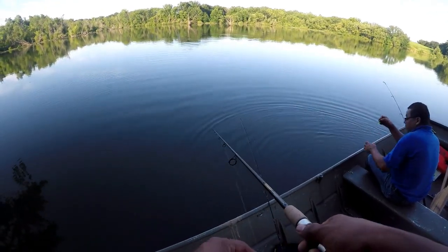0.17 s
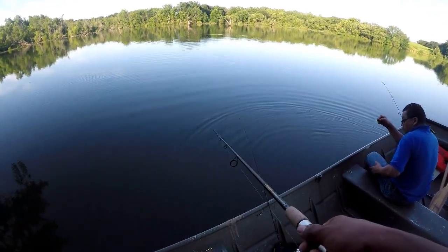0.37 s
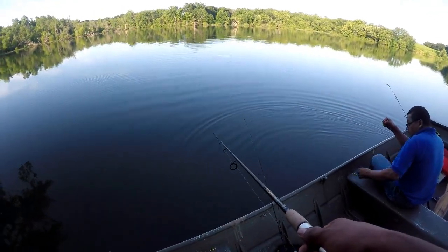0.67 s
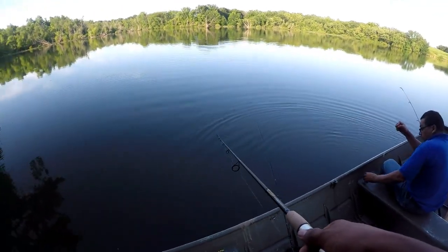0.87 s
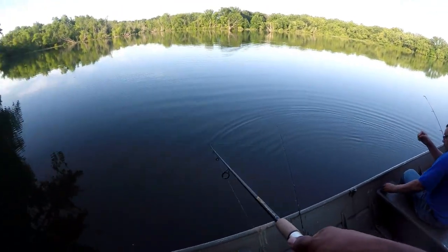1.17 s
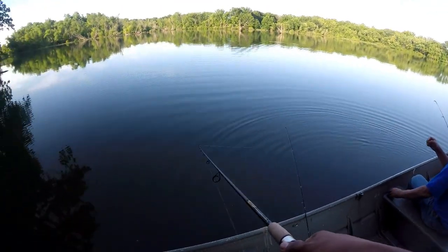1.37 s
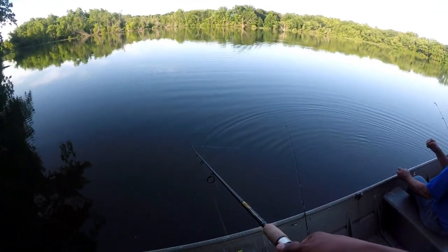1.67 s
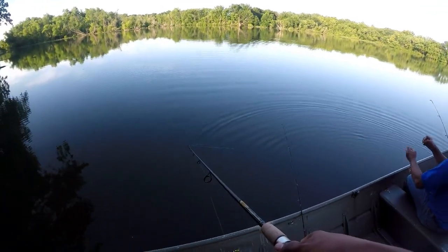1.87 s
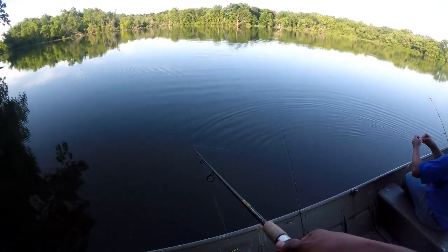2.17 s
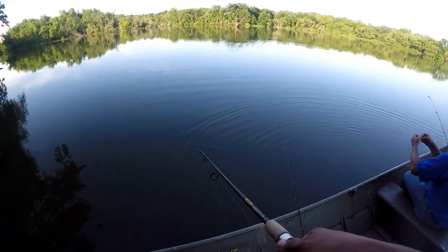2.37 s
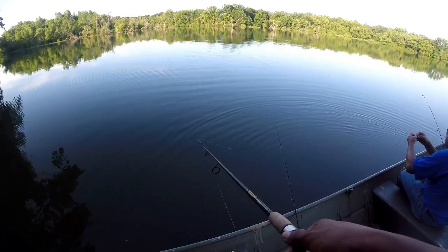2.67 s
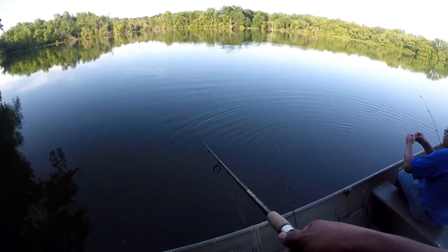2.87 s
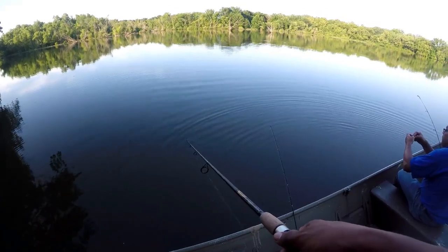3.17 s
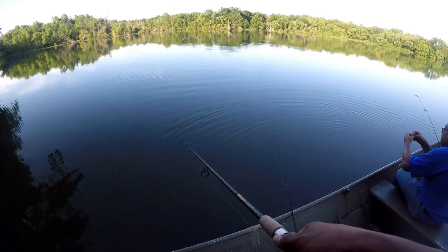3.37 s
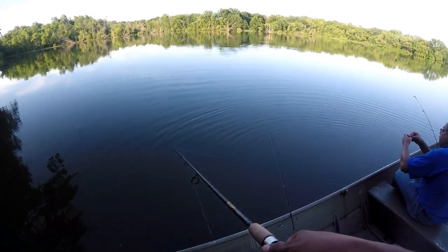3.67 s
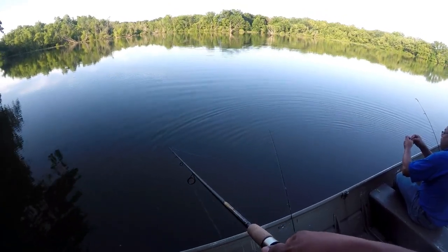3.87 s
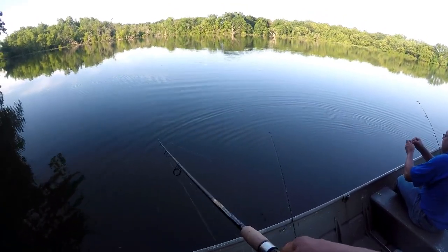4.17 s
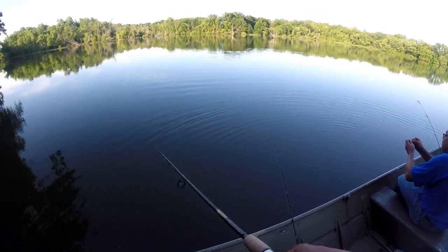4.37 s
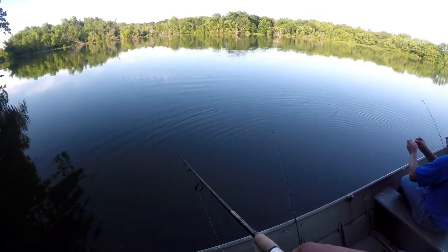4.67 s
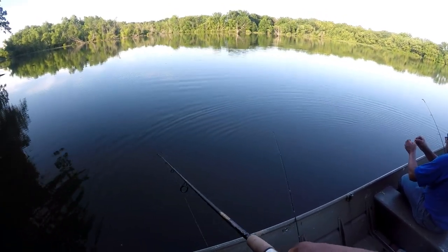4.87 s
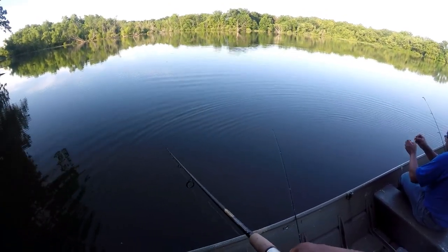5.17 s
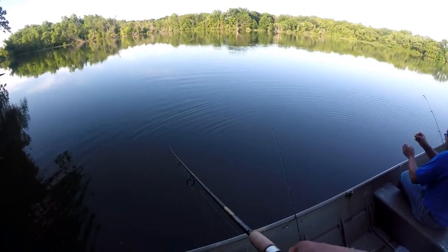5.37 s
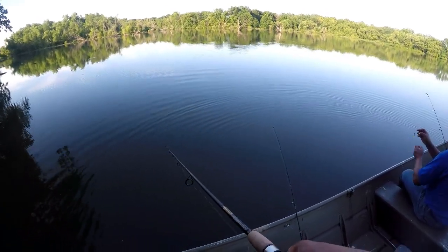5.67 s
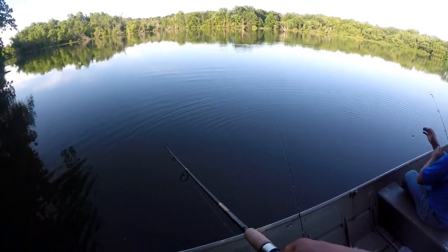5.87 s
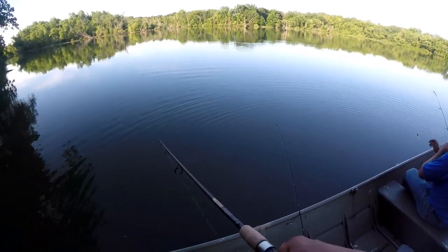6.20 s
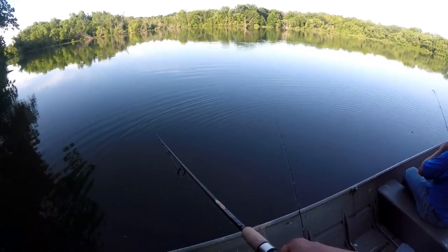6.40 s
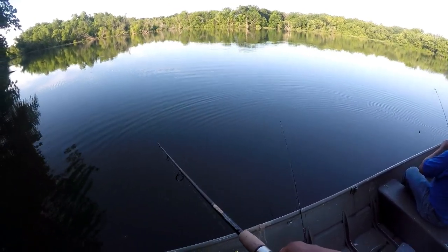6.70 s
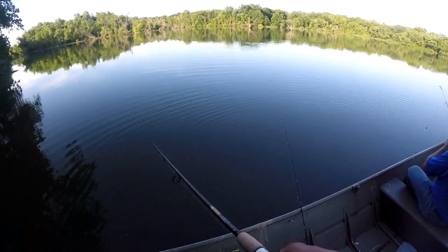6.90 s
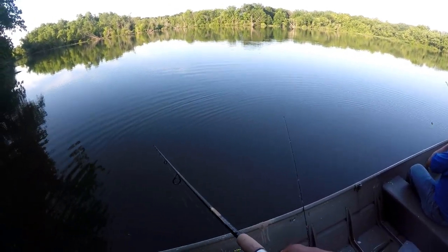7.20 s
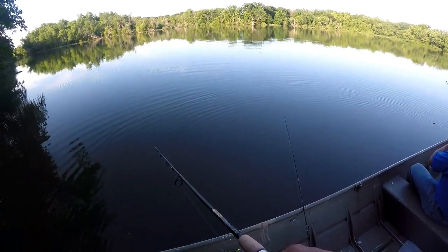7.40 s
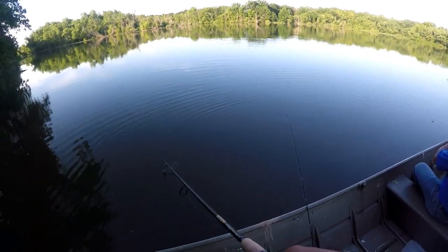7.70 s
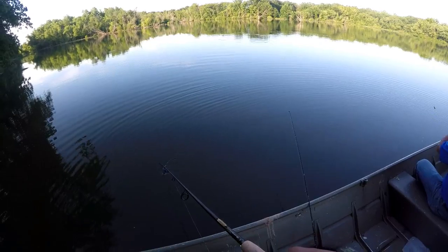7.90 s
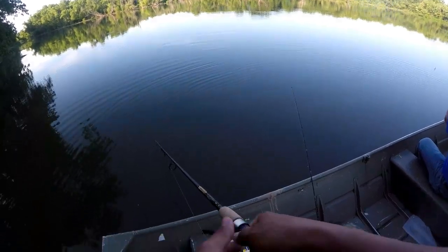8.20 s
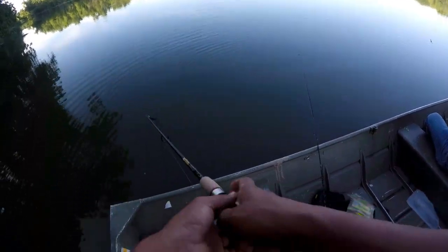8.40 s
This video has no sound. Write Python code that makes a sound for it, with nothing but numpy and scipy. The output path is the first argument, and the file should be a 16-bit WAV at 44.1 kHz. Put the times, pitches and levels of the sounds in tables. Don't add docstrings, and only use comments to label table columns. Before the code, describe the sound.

Outdoors on a quiet tree-ringed lake, a continuous chorus of rapid, raspy frog and insect chirps sits in a narrow high band. Cicadas buzz faintly and early on swoop downward; tiny bird chips and whistles appear, mostly from the middle onward. A soft low rumble of air and hull swells unevenly. The head-worn microphone picks up a few ticks late, then cloth rubbing and low knocks at the end.

```python
import sys
import numpy as np
from scipy import signal
from scipy.io import wavfile
from scipy.ndimage import uniform_filter1d

SR = 44100
rng = np.random.default_rng(int(sys.argv[2]) if len(sys.argv) > 2 else 0)


def to_linear_factor(level_db):
    exponent = np.asarray(level_db, float) / 20
    return 10 ** exponent


def generate_wav(signal):
    frames = np.transpose(np.atleast_2d(signal))
    scaled = np.clip(frames, -1, 1) * 32767
    pcm = np.round(scaled).astype(np.int16)
    wavfile.write(sys.argv[1], SR, pcm)


N = 376922

# f/Hz, density/dB
RUMBLE_SPECTRUM = [(3.5, 2), (6, -5.5), (25, 4), (33, -1), (41, 1), (49, 0), (57, -6.5), (75, -11),
                   (110, -28.5), (140, -48), (240, -120)]
# t/s, peak level/dB
GUSTS = [(0.01, -38), (.26, -47.5), (.69, -49), (1.05, -49), (1.35, -45), (1.7, -53), (2.05, -53),
         (2.5, -63), (2.78, -49), (3.0, -41.5), (3.045, -36), (3.38, -44), (4.04, -46.5), (4.55, -54),
         (4.72, -43), (4.88, -44), (6.04, -41), (6.72, -53), (6.97, -57), (7.43, -52), (7.84, -62),
         (8.05, -51), (8.18, -45), (8.28, -45), (8.38, -43), (8.47, -55)]
# f/Hz, density/dB
AIR_SPECTRUM = [(41, -28), (70, -2.5), (96, -3.5), (494, -21), (592, -23), (1360, -27), (2490, -29),
                (3570, -23), (4090, -29.5), (4570, -35), (6130, -32.5), (10000, -38), (12600, -47),
                (15000, -53)]
# f/Hz, level/dB
PORT_SIDE = [(60, -8.5), (92, 1), (140, 2.5), (210, 2.5), (330, 4), (500, 6.5), (760, 10.5), (1160, 8),
             (1760, 5), (2690, -2), (4110, -7.5), (6270, 1), (9570, -0.5), (14600, 0.5)]
# f/Hz, level/dB
PORT_BALANCE = [(60, 0.5), (110, 0), (200, -1.5), (370, 0.5), (690, -0.3), (1270, 0), (2340, -0.8),
                (4310, 3.5), (7930, -3.5), (14600, -0.5)]
# t/s, peak level/dB
LEAF_BREATHS = [(.4, -74), (1.2, -85), (2.0, -76), (2.3, -67.5), (2.65, -69), (3.0, -71), (3.65, -73),
                (4.05, -71), (4.85, -79), (5.3, -70), (6.0, -74), (7.4, -78)]
# t/s, level/dB
CHOIR_LEVEL = [(0, -74), (1.2, -77), (2.3, -71), (3.1, -78), (3.5, -90), (3.9, -74), (4.45, -92),
               (4.9, -74), (6, -70), (7, -73), (8, -73), (8.55, -71)]
# t/s, level/dB, f/Hz
FROG_CHORUS = [(1.9, -84, 2050), (2.2, -76, 1962), (2.5, -73.5, 2070), (2.85, -75.5, 2230),
               (3.1, -78, 2060), (3.4, -79, 2030), (3.7, -68, 1810), (4.25, -86, 1610), (4.85, -74, 1690),
               (5.1, -83, 1890)]
# t/s, level/dB, f/Hz
SNAPS = [(2.29, -55, 1343), (4.243, -54, 1900), (2.7, -54, 460), (3.015, -46, 560), (3.045, -63, 660),
         (2.65, -58, 7780), (4.98, -57, 4900), (5.125, -61, 4300), (5.15, -65, 4100), (5.21, -59, 1900),
         (2.94, -58, 6600), (3.128, -66, 1980), (4.11, -58, 6300), (5.89, -60, 7395), (6, -59, 5200),
         (7.02, -58, 4890), (8.36, -55, 4300), (7.957, -53.5, 1000), (7.957, -49, 500), (3.2, -55, 500),
         (3.03, -55, 420)]
# t/s, level/dB, ring f/Hz, decay time T60/s
TICKS = [(5.966, -37, 480, .035), (6.148, -37, 520, .03), (6.624, -38, 330, .07), (7.045, -38, 170, .06),
         (4.782, -46, 150, .08), (7.957, -38, 440, .05), (7.964, -39, 150, .08), (8.2, -40, 150, .08),
         (8.325, -34, 160, .12), (8.42, -36, 200, .1), (8.462, -33, 165, .1), (8.525, -36, 160, .1)]
# t/s, level/dB, ring f/Hz
SLIPS = [(8.105, -49, 450), (8.2, -44, 460), (8.29, -49, 750), (8.298, -44, 450), (8.325, -41, 190),
         (8.37, -38.5, 200), (8.25, -46, 200), (8.305, -52, 1080), (8.418, -48, 760), (8.47, -39, 115),
         (8.33, -43, 105), (8.425, -44, 200), (8.468, -33.5, 190), (8.51, -47, 450)]
# f/Hz, density/dB
CLOTH_SPECTRUM = [(150, -5), (260, -1), (297, -7), (461, -3), (633, -10), (754, -10), (934, -12.5),
                  (1730, -18.5), (2010, -27), (3000, -24), (3900, -71), (6600, -120)]
# f/Hz, level/dB
CLOTH_SIDE = [(60, -7), (130, 3), (290, 4.5), (630, 6.5), (1390, 14), (1560, 10), (1750, 0), (3040, -3),
              (6660, 2), (14600, 0)]
# t/s, peak level/dB
NUDGES = [(.32, -69), (1.4, -70.5), (2.25, -70), (2.36, -68), (2.55, -72), (3.03, -65.5), (3.68, -79),
          (4.8, -68), (6.0, -70), (7.0, -69)]
# t/s, pressure level/dB
STROKE = [(7.85, -80), (8.0, -65), (8.06, -58), (8.11, -53), (8.155, -57), (8.19, -48.5), (8.24, -47.5),
          (8.34, -48.5), (8.43, -50), (8.5, -53), (8.55, -50)]
# t/s, length/s, start f/Hz, end
# f/Hz, level/dB
SLIDES = [(3.615, .02, 2480, 2940, -56), (3.632, .016, 2880, 2660, -57), (3.644, .022, 2700, 2640, -61),
          (4.32, .011, 2550, 3050, -60), (4.329, .009, 3200, 2900, -62), (4.335, .013, 2850, 3350, -60),
          (6.203, .036, 3280, 3720, -62), (3.945, .03, 3620, 3800, -64), (5.125, .04, 4300, 3700, -70),
          (5.165, .04, 3250, 3100, -67), (6.292, .025, 3500, 2900, -66), (5.78, .1, 5840, 5830, -74),
          (5.884, .075, 3830, 3640, -62), (6.108, .018, 2250, 2830, -65), (6.124, .028, 2720, 2050, -64),
          (4.66, .03, 1700, 1620, -65), (7.086, .05, 3800, 4525, -70), (7.598, .04, 5600, 5980, -65),
          (7.198, .036, 6300, 5680, -68), (8.172, .036, 2480, 2720, -61), (6.66, .15, 4520, 4480, -77),
          (6.51, .05, 3250, 3150, -70), (7.13, .07, 3230, 3330, -69), (8.215, .03, 2640, 2570, -74)]
# t/s, length/s, foot f/Hz, top f/Hz,
# level/dB
ARCHES = [
    (5.054, .08, 3950, 4700, -66),
    (5.125, .043, 3270, 3620, -62),
    (3.82, .038, 3280, 3480, -63),
]
# t/s, length/s, start f/Hz, end f/Hz, level/dB
SLIDES_RIGHT = [(.9, .09, 2330, 1680, -69), (1.71, .095, 2230, 1620, -69), (1.74, .04, 2580, 2520, -72),
                (5.75, .05, 5550, 4600, -73), (5.945, .035, 2980, 2300, -71), (6.21, .04, 6200, 6130, -69),
                (6.165, .045, 5450, 4300, -73), (6.285, .03, 2900, 2200, -72), (6.77, .05, 2950, 3350, -69),
                (7.946, .05, 6590, 6590, -74)]
# t/s from its start, length/s, start f/Hz, end f/Hz, level/dB
CHIP = [
    (0, .024, 5300, 5850, -61),
    (.052, .06, 6280, 5750, -68.5),
]
# t/s, added level/dB, left minus right/dB
CHIP_TIMES = [(.272, -4, .8), (1.986, 2, .8), (3.568, 0, -3.5), (4.718, -3, .8)]
# t/s from its start, length/s, start f/Hz, end f/Hz, level/dB
WARBLE = [
    (0, .042, 4250, 6000, -68),
    (.033, .03, 5880, 5990, -69),
    (.072, .028, 6650, 5050, -66),
    (.102, .035, 5070, 4980, -72),
]
# t/s, added level/dB, left minus right/dB
WARBLE_TIMES = [
    (7.283, -1, -7.5),
    (7.578, -1, -7.5),
]
# t/s, f/Hz, level/dB
WHISTLES = [
    [(8.015, 2417, -75), (8.025, 2461, -63), (8.055, 2686, -65), (8.081, 2701, -65), (8.115, 2850, -65),
     (8.139, 3091, -65), (8.15, 3010, -63), (8.16, 2940, -73)],
    [(5.25, 2370, -74), (5.274, 2330, -65), (5.298, 2276, -63), (5.335, 2250, -65), (5.355, 2210, -71),
     (5.375, 2190, -67), (5.396, 2165, -71), (5.41, 2150, -81)],
    [(4.442, 2640, -72), (4.455, 2800, -60), (4.47, 2850, -59), (4.49, 2250, -69), (4.505, 2150, -69),
     (4.535, 2280, -71), (4.58, 2330, -75), (4.59, 2330, -82)],
    [(4.343, 3400, -68), (4.352, 3420, -56), (4.368, 3390, -53), (4.38, 3270, -59), (4.387, 3240, -74)],
]
# start t/s, length/s, level/dB, abdomen resonance f/Hz, drop at the end (0 to 1)
SWINGS = [
    (0.202, 0.4, -72.5, 5620, 0.88),
    (0.923, 0.5, -70.5, 5530, 0.99),
    (1.776, 0.42, -69.5, 5530, 0.99),
    (2.503, 0.19, -69, 5350, 0),
    (3.602, 0.056, -69, 5700, 0),
    (4.717, 0.21, -71, 5970, 0.07),
    (5.208, .3, -72, 5920, 0),
    (5.706, 0.51, -70.5, 5800, 0.02),
    (6.802, 0.82, -74, 5680, 0),
    (8.2, 0.46, -73, 5620, 0.06),
]
# centre t/s, level/dB, f/Hz
LOW_CHIRPS = [(0.014, -77, 3470), (0.096, -62, 3450), (0.166, -64, 3440), (0.267, -66, 3220),
              (0.319, -62, 3420), (0.547, -61, 3400), (0.762, -62, 3480), (0.828, -61, 3360),
              (0.886, -62, 3400), (0.996, -56.5, 3450), (1.076, -63, 3450), (1.261, -54, 3480),
              (1.389, -65, 3450), (1.525, -59, 3400), (1.646, -61, 3416), (1.772, -60, 3400),
              (1.999, -60.5, 3370), (2.351, -62, 3204), (2.415, -61, 3450), (2.518, -62, 3470),
              (2.632, -62, 3430), (2.828, -61.5, 3380), (3.021, -61.5, 3440), (3.069, -60.5, 3480),
              (3.229, -76, 3440), (3.438, -58, 3460), (3.496, -79, 3420), (3.87, -61, 3700),
              (4.045, -62, 3470), (4.57, -63.0, 3450), (4.849, -66, 3270), (5.023, -75, 3280),
              (6.817, -60.5, 3480), (6.864, -71, 3370), (7.178, -65, 3260), (7.439, -65, 3270),
              (7.595, -79, 3440), (7.613, -74, 2980), (7.996, -66, 3200), (8.289, -57.5, 3440),
              (8.359, -67, 3160), (8.469, -60, 3440), (8.539, -62, 3410)]
# centre t/s, level/dB, f/Hz
HIGH_CHIRPS = [(0.649, -62, 3610), (0.932, -67, 3540), (1.131, -61, 3530), (1.159, -64, 3500),
               (1.325, -63, 3560), (1.455, -62, 3650), (1.702, -66, 3710), (1.868, -59, 3490),
               (2.065, -58, 3620), (2.261, -63, 3700), (2.305, -61, 3620), (2.584, -60, 3450),
               (2.676, -58, 3430), (2.913, -59, 3610), (2.965, -65, 3550), (3.109, -65, 3500),
               (3.34, -60, 3580), (3.552, -58, 3600), (3.71, -57, 3520), (3.761, -59, 3630),
               (3.917, -65, 3530), (3.961, -60, 3730), (4.147, -56.5, 3580), (4.18, -61, 3720),
               (4.276, -60, 3500), (4.512, -60, 3550), (4.711, -55.5, 3660), (4.801, -62, 3670),
               (4.913, -55.5, 3550), (5.082, -66, 3640), (5.312, -60, 3760), (5.38, -54, 3620),
               (5.476, -57, 3480), (5.599, -60, 3550), (5.683, -60, 3730), (5.813, -55.5, 3600),
               (6.014, -56, 3540), (6.082, -59, 3700), (6.222, -62, 3540), (6.292, -60, 3700),
               (6.34, -71, 3610), (6.427, -57.5, 3540), (6.491, -59, 3610), (6.621, -56.5, 3530),
               (6.713, -59.0, 3680), (6.91, -66, 3800), (6.968, -61, 3790), (7.098, -57, 3790),
               (7.222, -61.5, 3660), (7.299, -60, 3680), (7.487, -58, 3630), (7.689, -58, 3680),
               (7.75, -61, 3790), (7.82, -60, 3750), (7.882, -60, 3610), (8.088, -60, 3640),
               (8.138, -60, 3790), (8.361, -61, 3750), (8.419, -66, 3700)]
# centre t/s, level/dB, f/Hz
OTHER_CHIRPS = [(4.318, -56.5, 3500), (4.393, -71, 3600), (5.147, -54, 3510), (5.915, -57, 3770),
                (2.345, -65, 1900), (2.82, -63, 2150), (2.925, -63, 2180), (3.04, -67, 2020),
                (3.075, -64.5, 2150), (3.13, -74, 1980), (4.28, -63, 1513), (7.71, -62, 3204)]


def evened(x):
    return x / np.sqrt(np.mean(x ** 2) + 1e-20)


def read(points, hz):
    f, value = np.transpose(points)
    return np.interp(np.log(hz + 1), np.log(f + 1), value)


def curve(rows):
    s, *columns = np.transpose(rows)
    return [np.interp(np.arange(N) / SR, s, c) for c in columns]


def bumps(rows, width):
    t = np.linspace(0, N / SR, num=2000)
    swell = sum(to_linear_factor(db) * np.exp(-((t - s) / width) ** 2) for s, db in rows)
    return np.interp(np.arange(N) / SR, t, swell)


def add(mix, s, sound):
    part = mix[..., max(round(s * SR), 0):][..., :sound.shape[-1]]
    part += sound[..., :part.shape[-1]]


def resonate(x, hz, width):
    turn = np.exp(2j * np.pi * np.cumsum(hz * np.ones(x.shape[-1])) / SR)
    r = np.exp(-np.pi * width / SR)
    smooth = signal.lfilter([(1 - r) ** 2], [1, -2 * r, r * r], x / turn + 1e-18)
    return 2 * (turn * smooth).real


def clicks(rate, jitter, uneven):
    wobble = evened(uniform_filter1d(rng.standard_normal(N), 300))
    turns = np.floor(np.cumsum(rate * (1 + jitter * wobble)) / SR)
    return np.diff(turns, prepend=0) * (1 + uneven * rng.standard_normal(N))


def port_noise(spectrum, side, size, patchy_db, flicker_db):
    frames, hz = 4 * N // size + 6, np.fft.rfftfreq(size, 1 / SR)
    a, b, c, d, patches = rng.standard_normal((frames, len(hz), 5)).T
    patches = evened(uniform_filter1d(uniform_filter1d(patches, 12, 0), 12, 1))
    flicker = evened(uniform_filter1d(rng.standard_normal(frames), 6))
    level = to_linear_factor(read(spectrum, hz)[:, None] + patchy_db * patches + flicker_db * flicker)
    total = (a + 1j * b) * level
    difference = (c + 1j * d) * level * to_linear_factor(read(side, hz))[:, None]
    lean = to_linear_factor(read(PORT_BALANCE, hz) / 2)[:, None]
    z = np.array([(total + difference) * lean, (total - difference) / lean])
    pair = signal.istft(z, nperseg=size, noverlap=3 * size // 4)[1][:, :N]
    return pair / np.sqrt(np.mean(pair.mean(0) ** 2))


def shore(x, t60, wet_db):
    t = np.arange(SR // 2) / SR
    signs = rng.choice([-1., 1.], (2, len(t)))
    sparse = rng.random((2, len(t))) < .05
    taps = signs * sparse * to_linear_factor(-60 * t / t60) * (t > .004)
    echo = signal.fftconvolve(np.atleast_2d(x), taps / np.linalg.norm(taps[0]), axes=1)[:, :N]
    return x + to_linear_factor(wet_db) * echo


def rumble():
    swell = to_linear_factor(-48.5) + bumps(GUSTS, .035)
    return swell * port_noise(RUMBLE_SPECTRUM, PORT_SIDE, size=8192, patchy_db=-1.13, flicker_db=-1.0)


def air():
    return to_linear_factor(-55) * port_noise(AIR_SPECTRUM, PORT_SIDE, size=1024, patchy_db=1.17, flicker_db=0.65)


def leaves():
    return bumps(LEAF_BREATHS, .2) * evened(resonate(rng.standard_normal((2, N)), 6600, 3200))


def choir():
    return to_linear_factor(curve(CHOIR_LEVEL)[0]) * evened(resonate(rng.standard_normal((2, N)), 4620, 1300))


def frogs():
    db, hz = curve(FROG_CHORUS)
    croaks = uniform_filter1d(clicks(70, 0.37, 0.28), size=700) * rng.standard_normal(N)
    return shore(to_linear_factor(db) * evened(resonate(croaks, hz, 540)), 0.17, 1)


def snaps():
    out, t = np.zeros((2, N)), np.arange(1500) / SR
    for s, db, hz in SNAPS:
        puff = evened(resonate(rng.standard_normal((2, len(t))), hz, .25 * hz))
        add(out, s, to_linear_factor(db - 60 * t / .05) * puff)
    return out


def ticks():
    out, t = np.zeros((2, N)), np.arange(4000) / SR
    for s, db, hz, t60 in TICKS:
        low_knock = hz < 250
        ring = np.sin(2 * np.pi * hz * t)
        ring += .7 * np.sin(2 * np.pi * 2.3 * hz * t) * to_linear_factor(-40 * t / t60)
        ring += .8 * np.sin(2 * np.pi * .4 * hz * t) * to_linear_factor(30 * t / t60) * (hz > 250)
        ports = np.array([[1.], [-.9 * to_linear_factor(4.5 * low_knock)]])
        add(out, s, ports * to_linear_factor(db - 60 * t / t60) * ring * np.minimum(t / 0.0017, 1))
    return out


def slips():
    out, t = np.zeros(N), np.arange(2200) / SR
    for s, db, hz in SLIPS:
        drift = 1 + .04 * evened(uniform_filter1d(rng.standard_normal(len(t)), size=300))
        ring = 2 * np.sin(2 * np.pi * np.cumsum(hz * drift) / SR)
        add(out, s, to_linear_factor(db - 60 * t / .09) * np.minimum(t / .008, 1) * ring)
    return out * to_linear_factor(np.array([[-1.0], [1.0]]))


def cloth():
    stroke, nudges = to_linear_factor(curve(STROKE)[0]), bumps(NUDGES, .087)
    to_go = 8.482 - np.arange(N) / SR
    grain = port_noise(CLOTH_SPECTRUM, CLOTH_SIDE, size=512, patchy_db=1.5, flicker_db=1.5)
    rub = (to_linear_factor(-69) + nudges + stroke) * grain
    left, other = evened(resonate(rng.standard_normal((2, N)), 133, 140))
    shaking = to_linear_factor(-7.0) * nudges + stroke * to_linear_factor(7 - 21.5 * to_go)
    shake = shaking * np.array([left, to_linear_factor(4.5) * (0.77 * other - 0.56 * left)])
    hiss = evened(resonate(rng.standard_normal((2, N)), 6600, 3200))
    swish = stroke * to_linear_factor(-9.5 - 53 * to_go) * hiss
    hum = stroke * to_linear_factor(-9.0) * evened(resonate(rng.standard_normal(N), 467, 50)) * np.array([[1.], [.3]])
    for hz, db in ((194, -11.0), (746, -24.0)):
        hum += stroke * to_linear_factor(db) * evened(resonate(rng.standard_normal(N), hz, 39))
    return rub + shake + swish + hum


def bird_notes():
    notes = [(*row, .8, 0) for row in SLIDES]
    notes += [(*row, .8, 1) for row in ARCHES]
    notes += [(*row, -5, 0) for row in SLIDES_RIGHT]
    for phrase, times in ((CHIP, CHIP_TIMES), (WARBLE, WARBLE_TIMES)):
        for at, more_db, lean_db in times:
            notes += [(at + s, length, a, b, db + more_db, lean_db, 0) for s, length, a, b, db in phrase]
    return notes


def birds():
    out = np.zeros((2, N))
    for s, length, from_hz, to_hz, db, lean_db, arched in bird_notes():
        u = np.arange(round(length * SR)) / (length * SR)
        raspy = from_hz > 5000 and length < .025
        rasp = raspy * evened(uniform_filter1d(rng.standard_normal(len(u)), 40))
        path = np.sin(np.pi * u ** .7) if arched else u
        hz = (from_hz + (to_hz - from_hz) * path) * (1 + rasp / 36)
        waver = 1 + .18 * evened(uniform_filter1d(np.resize(rng.standard_normal(4000), len(hz)), 150))
        edges = signal.windows.tukey(len(hz), min(500 / len(hz), 1)) * to_linear_factor(-7 * (2 * u - 1) ** 2)
        note = np.sqrt(2) * np.sin(2 * np.pi * np.cumsum(hz) / SR) * waver * edges
        add(out, s, to_linear_factor(db + np.array([[lean_db / 2], [-lean_db / 2]])) * note)
    for rows in WHISTLES:
        s, hz, db = np.transpose(rows)
        t = np.arange(s[0], s[-1], 1 / SR)
        path = uniform_filter1d(np.interp(t, s, hz), size=200, mode="nearest")
        flutter, drift = evened(uniform_filter1d(rng.standard_normal((2, len(t))), size=180))
        tone = np.sin(2 * np.pi * np.cumsum(path * (1 + .004 * drift)) / SR)
        add(out, s[0], np.sqrt(2) * to_linear_factor(np.interp(t, s, db) + 1.0) * (1 + .28 * flutter) * tone)
    return shore(out, .32, -7)


def cicada():
    buzz_rate, drop_rate = 148, 270
    drop_s, edge_s = .13, .06
    rows = []
    for s, length, db, hz, drop in SWINGS:
        end, low_hz = s + length, hz + drop * (3610 - hz)
        sag_hz = low_hz - drop * 300
        rate = buzz_rate + drop * (drop_rate - buzz_rate)
        rows += [(s - edge_s, db - 18, hz, buzz_rate),
                 (s, db, hz, buzz_rate),
                 (end, db, hz, buzz_rate),
                 (end + .03 * drop, db + drop * 8, low_hz, rate),
                 (end + drop * drop_s, db + drop * 8 / 2, sag_hz, rate),
                 (end + drop * drop_s + edge_s, db - 15, sag_hz, rate)]
    db, hz, rate = curve(rows)
    drive = evened(clicks(rate, .008, .15)) + .35 * rng.standard_normal(N)
    buzz = to_linear_factor(db) * evened(resonate(drive, hz, 1200))
    ports = np.array([buzz, np.roll(buzz, shift=4)])
    return shore(ports, 0.65, 1)


def sing(train, rows, width):
    out, t = np.zeros(N), np.arange(2200) / SR
    for s, db, hz in rows:
        start = max(s - t[-1] / 2, 0)
        run = np.resize(train[round(start * SR):][:len(t)], len(t))
        voice = resonate(run, hz + 7000 * (t - t[-1] / 2), width)
        add(out, start, to_linear_factor(db) * evened(voice) * np.hanning(len(t)) ** 0.61)
    return out


def chorus():
    near_clicks, far_clicks = clicks(265, .12, 0.27), clicks(230, .1, 0.57)
    times = np.linspace(0, 8.5, num=220) + rng.uniform(0, .035, 220)
    sizes, tunes = rng.standard_normal((2, 220))
    crowd = [(s, -72 - 3.2 * max(s - 6.4, 0) + 1.6 * size, 3540 + 190 * tune)
             for s, size, tune in zip(times, sizes, tunes)]
    chirps = [(s, db - 3, hz) for s, db, hz in [*LOW_CHIRPS, *HIGH_CHIRPS, *OTHER_CHIRPS]]
    near = sing(near_clicks, chirps, 400) * to_linear_factor(np.array([[3.2], [.8]]))
    far = sing(far_clicks, crowd, 470) * to_linear_factor(np.array([[1.2], [-1.2]]))
    pair = shore(near, 0.28, -6.0) + to_linear_factor(2.5) * shore(far, 0.53, -0.5)
    top = signal.butter(N=6, Wn=3980, fs=SR, output="sos")
    return signal.sosfilt(top, pair)


def scene():
    background = rumble() + air() + leaves() + choir() + frogs()
    handling = snaps() + ticks() + slips() + cloth()
    return background + handling + birds() + cicada() + chorus()


def low_pass(x):
    return signal.sosfilt(signal.butter(12, 15200, fs=SR, output="sos"), x)


def record(dry):
    whine = to_linear_factor(-88) * np.sin(2 * np.pi * 6000 * np.arange(N) / SR)
    limit = signal.firwin(255, 15060, window=("kaiser", 5), fs=SR)[None]
    mix = signal.oaconvolve(dry + whine, limit, "same")
    return low_pass(mix)


dry = scene()
out = record(dry)
generate_wav(out)
```